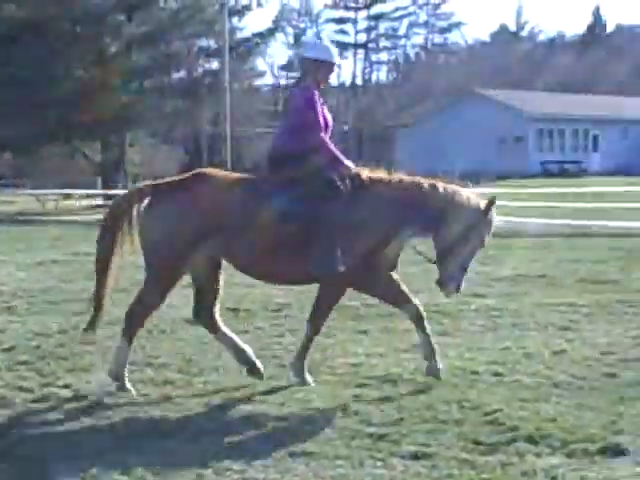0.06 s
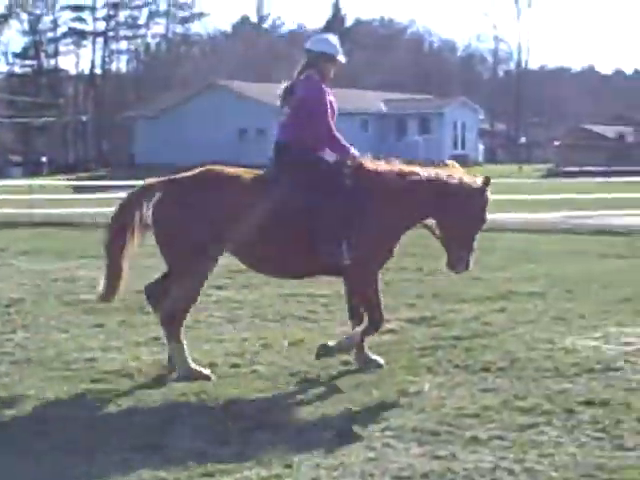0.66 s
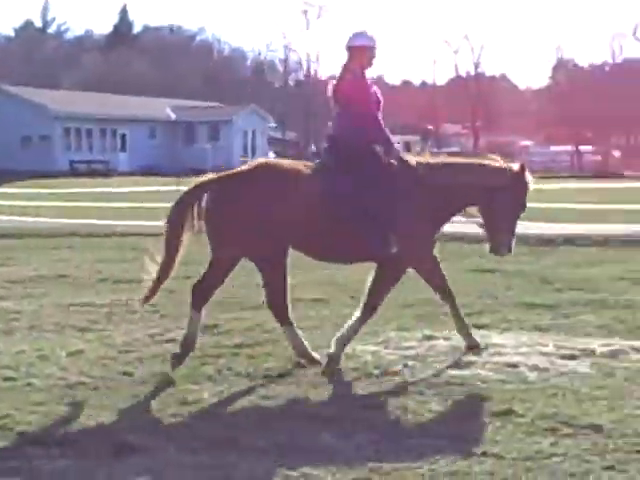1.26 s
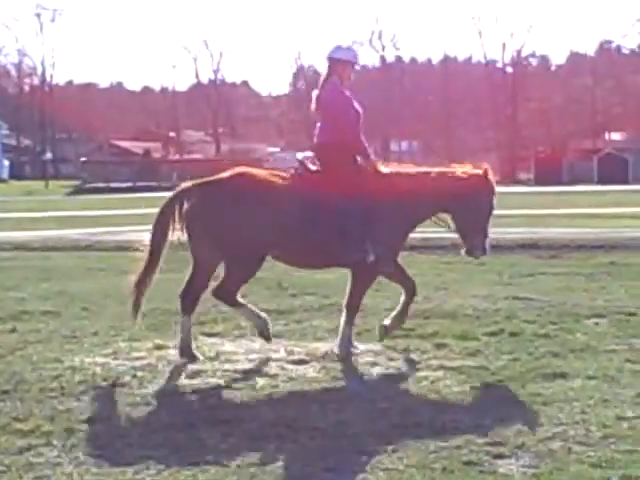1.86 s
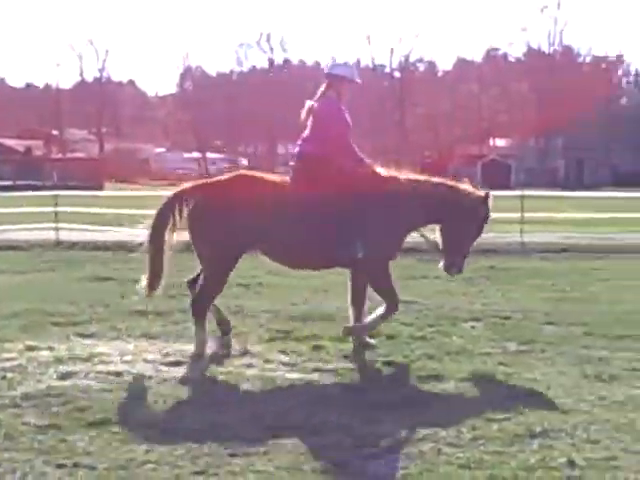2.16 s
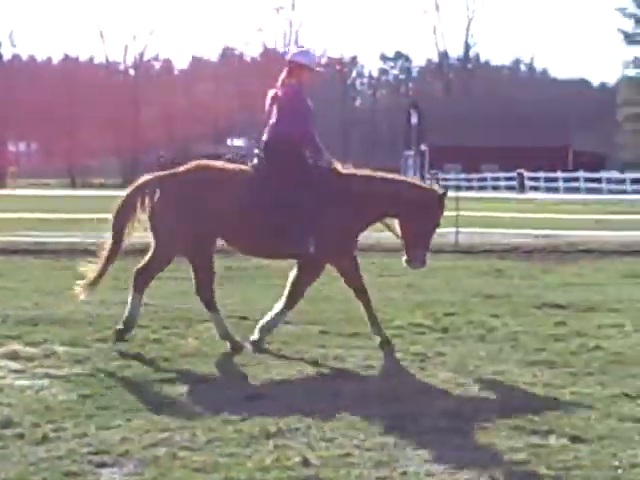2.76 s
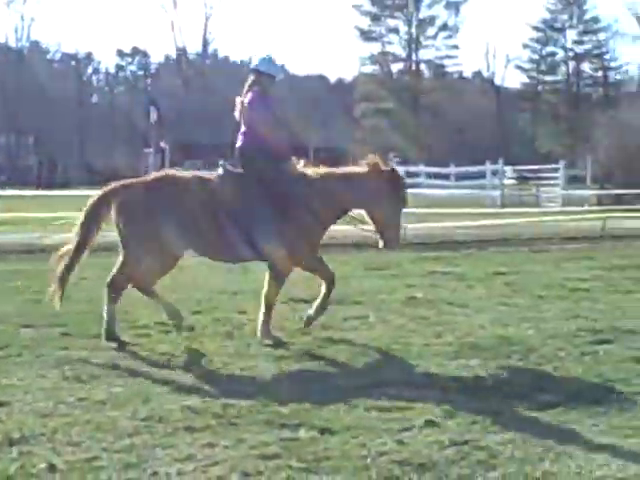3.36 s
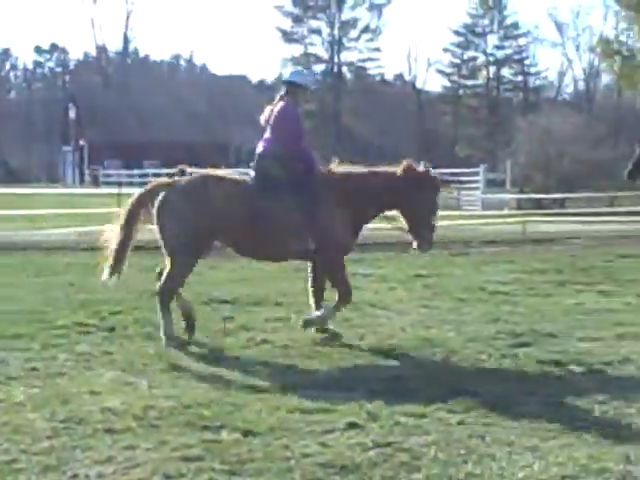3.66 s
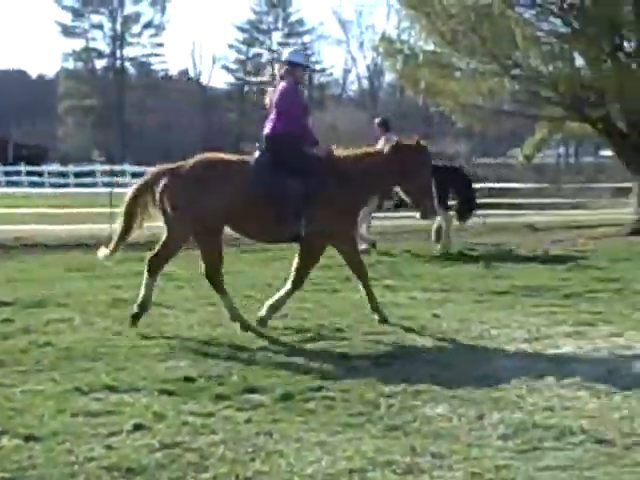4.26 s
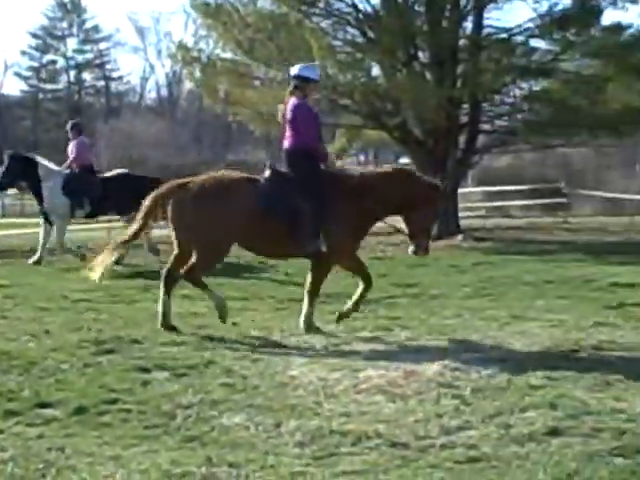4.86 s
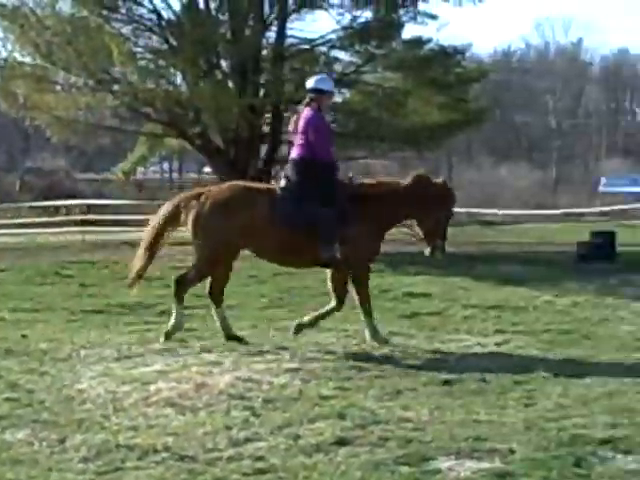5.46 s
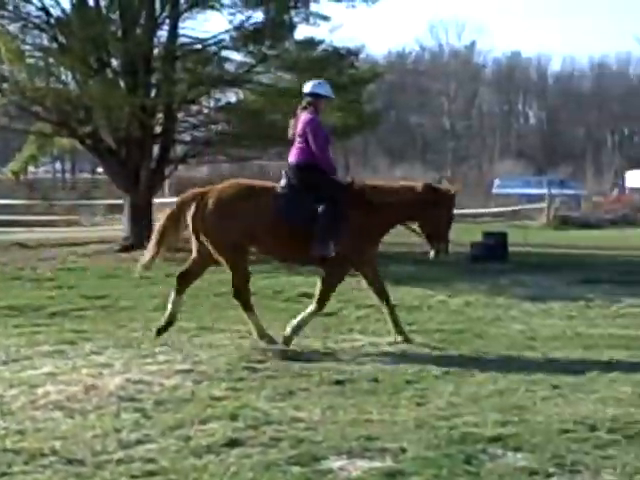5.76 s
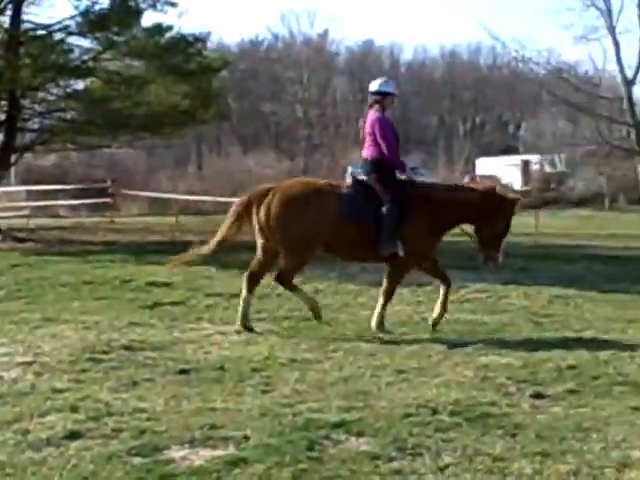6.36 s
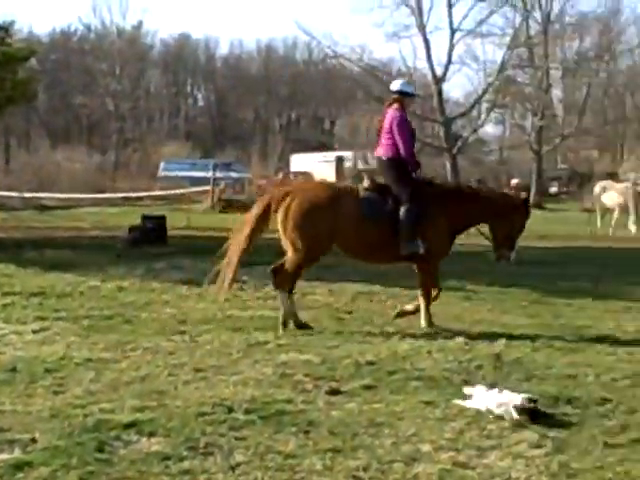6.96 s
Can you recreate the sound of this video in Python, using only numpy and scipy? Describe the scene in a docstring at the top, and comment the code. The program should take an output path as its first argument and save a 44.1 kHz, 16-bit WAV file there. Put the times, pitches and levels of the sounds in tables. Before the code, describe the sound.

A horse trots over grass with soft thuds and swishes, while small birds chirp over light wind and a distant engine drone.

```python
"""Light wind rumbles on the microphone of a small camera in an open grass field; a far engine drones.
A horse trots across: on each beat a soft thud in the turf, then two legs swishing through the blades.
It crunches through dry straw; elsewhere along the path stalks snap, a buckle clinks and leather creaks.
Small songbirds buzz and chirrup nearby, others sing farther off, and the camera adds a thin whine."""
import sys
import numpy as np
from scipy import signal
from scipy.fft import rfft, irfft, next_fast_len
from scipy.io import wavfile
from scipy.ndimage import uniform_filter1d, map_coordinates

SR = 44100
rng = np.random.default_rng(int(sys.argv[2]) if len(sys.argv) > 2 else 0)


def transcribe(u):
    """Save the signal u as a 16-bit wav file named by the first command-line argument.

    u: samples, shape (n,) or (channels, n), limited to [-1, 1]; the rate is SR.
    q: integer samples, one column per channel.
    """
    v = np.clip(np.atleast_2d(u).T, -1, 1)
    q = np.round(v * 32767).astype(np.int16)
    wavfile.write(sys.argv[1], SR, q)


N = 317079
TIME = np.arange(N) / SR


def amp(db):
    """Decibels to gain."""
    return 10 ** (np.asarray(db) / 20)


def unit(x):
    """Scales to rms 1."""
    return x / np.sqrt(np.mean(x ** 2) + 1e-20)


def curve(rows):
    """Joins (seconds, value) rows over the whole scene."""
    return np.interp(TIME, *np.transpose(rows))


def add(mix, start, sound):
    """Mixes a sound in at a start time in seconds."""
    part = mix[max(round(start * SR), 0):][:len(sound)]
    part += sound[:len(part)]


def colour(x, points, tilt_db=0):
    """Filters by a (Hz, dB) spectrum, tilted by dB per octave."""
    size = next_fast_len(len(x))
    octave = np.log2(np.fft.rfftfreq(size, 1 / SR) + 1)
    hz, db = np.transpose(points)
    corners = np.log2(hz)
    tilt = tilt_db * (np.clip(octave, corners[0], corners[-1]) - corners[-1])
    gain = amp(np.interp(octave, corners, db) + tilt)
    return irfft(rfft(x, size) * gain, size)[:len(x)]


def band(x, hz, width_octaves):
    """Steep band-pass reaching width_octaves to each side of hz, rms 1."""
    edges = np.clip(hz * 2 ** (np.array([-1, 1]) * width_octaves), 100, SR / 2 - 100)
    return unit(signal.sosfilt(signal.butter(3, edges, btype="band", fs=SR, output="sos"), x))


def low_pass(x, hz):
    """Steep cut above hz."""
    return signal.oaconvolve(x, signal.firwin(511, hz, window=("kaiser", 9), fs=SR), "same")


def noise(points):
    """Steady noise of a given colour, rms 1."""
    return unit(colour(rng.standard_normal(N), points))


def drift(rate):
    """Slow random wander of rms 1, up to about rate cycles a second."""
    coarse = TIME[::64]
    wander = map_coordinates(rng.standard_normal(1024), [coarse * 2 * rate], order=2, mode="wrap")
    return np.interp(TIME, coarse, unit(wander))


def crackle(count, per_s, spread_db, hiss):
    """Many tiny fractures of uneven size over a bed of rubbing noise."""
    size = amp(spread_db * np.minimum(rng.exponential(1, count), 4))
    clicks = size * rng.choice([-1, 1], count) * (rng.random(count) < per_s / SR)
    return unit(unit(clicks) + hiss * rng.standard_normal(count))


# The breeze at the microphone, dying down. Each row: time in seconds, relative level in dB.
BREEZE = [(0, -41), (1.3, -42), (2.0, -50.5), (3.7, -48.5), (4.3, -51.5), (7.19, -54)]
# Gusts right on the microphone. Each row: peak time and half length in seconds, relative level in dB.
GUSTS = [(0.01, 0.059, -30.5), (0.683, .13, -37), (1.65, .05, -37), (2.787, 0.04, -40.5),
         (3.775, 0.055, -36.5)]
# The rumble they both make. Each row: frequency in Hz, relative level in dB.
WIND_COLOUR = [(1, -34), (4, -15.5), (9, 2), (20, -6.5), (35, -5), (60, -11.5), (100, -17.5), (160, -27.5),
               (300, -43.5), (800, -70.5)]


def wind(level_db=1.0, restless_db=3.0):
    """Eddies push on the microphone: a restless breeze and a few brief gusts."""
    breeze = amp(curve(BREEZE) + restless_db * drift(4))
    gusts = sum(amp(db) * np.exp(-((TIME - peak) / half) ** 2) for peak, half, db in GUSTS)
    return amp(level_db) * np.hypot(breeze, gusts) * noise(WIND_COLOUR)


# The field ahead of the camera, before and after it turns. Each row: frequency in Hz, relative dB.
FIELD_BEFORE = [(20, 14.5), (60, 20), (100, 15), (150, 10), (210, 7), (290, 0), (450, -1.5), (640, 0),
                (800, -5), (1020, -1), (1500, -9), (2100, -12), (4000, -13), (7000, -16)]
FIELD_AFTER = [(20, 9.5), (60, 18), (100, 20.5), (150, 7.5), (210, 5), (290, -1.5), (470, 0.5), (800, -2.5),
               (1150, -4.5), (1500, -7), (2100, -10.5), (3300, -13), (7000, -13.5)]
# The camera's turn. Each row: time in seconds, share of the turn from 0 to 1.
TURN = [(1.6, 0), (3.2, 1)]
# Two far rushes, a low one midway and a higher one at the end. Each row: time in seconds, level in dB.
LOW_RUSH = [(2.6, -67.5), (3.2, -60.5), (3.8, -61.5), (4.4, -73)]
HIGH_RUSH = [(6.6, -73), (6.95, -66.5), (7.19, -62.5)]
# Their spectra at the microphone. Each row: frequency in Hz, relative level in dB.
LOW_RUSH_COLOUR = [(120, -12.5), (210, 3.5), (300, -4.5), (420, -3), (600, -11.5), (1000, -25.5)]
HIGH_RUSH_COLOUR = [(700, -33.5), (1050, 2), (1250, -1.5), (1500, -10), (2200, -30)]


def field(level_db=-49.8, restless_db=0.59):
    """The far wash of open country changes colour as the camera turns; two faint rushes swell in it."""
    turned = np.clip(curve(TURN), 0, 1)
    wash = np.sqrt(1 - turned) * noise(FIELD_BEFORE) + np.sqrt(turned) * noise(FIELD_AFTER)
    high_rush = amp(curve(HIGH_RUSH)) * noise(HIGH_RUSH_COLOUR)
    low_rush = amp(curve(LOW_RUSH)) * noise(LOW_RUSH_COLOUR)
    return amp(level_db + restless_db * drift(9)) * wash + high_rush + low_rush


# An engine a long way off. Each row: time in seconds, speed in cycles a second.
ENGINE_SPEED = [(0, 28.2), (1.0, 24.0), (1.35, 23.2), (2.0, 22.9), (2.64, 26.1), (3.0, 27.2), (3.3, 26.9),
                (3.9, 23.4), (4.35, 21.1), (4.8, 20.8), (5.5, 25.6), (6.05, 26.5), (6.4, 26.3),
                (6.65, 24.8), (7.19, 24.2)]
# Its drone at the microphone. Each row: time in seconds, level in dB.
ENGINE_LEVEL = [(0, -43.5), (1.2, -44.5), (3.1, -41.5), (4.2, -49.5), (4.6, -44.5), (4.95, -48.5),
                (5.5, -43), (6.45, -41.5), (6.8, -47), (7.19, -43.5)]
# Its harmonics. Each row: multiple of the engine speed, relative level in dB.
ENGINE_ORDERS = [(1, -11.5), (2, 2), (3, 0.5), (4, -7), (5, -20), (6, -15), (7, -18), (8, -28.5), (9, -25),
                 (10, -34.5)]
# The boom of its exhaust. Each row: time in seconds, lift at the resonance in dB.
EXHAUST_LIFT = [(0, 2.5), (2.35, 9), (3.6, 5), (5.6, 9), (7.19, 10)]


def engine(exhaust_hz=149.2, exhaust_width_hz=12.2, waver_db=1.7, phase_wander=0.22, smear=0.5):
    """A far engine's harmonics swell as they cross the exhaust resonance; moving air makes each waver."""
    speed, lift = curve(ENGINE_SPEED), curve(EXHAUST_LIFT)
    turns, out = np.cumsum(speed) / SR, np.zeros(N)
    for order, db in ENGINE_ORDERS:
        lift_db = lift / (1 + ((order * speed - exhaust_hz) / exhaust_width_hz) ** 2)
        lag = smear * order ** 2  # higher orders lag, blurring each throb
        phase = 2 * np.pi * order * turns - lag + phase_wander * drift(4)
        out -= amp(db + lift_db + waver_db * drift(3)) * np.sin(phase)
    return amp(curve(ENGINE_LEVEL)) * unit(out)


# Songbirds in the far trees. Each row: frequency in Hz, relative level in dB.
CHORUS_COLOUR = [(2050, -37.5), (2380, -4), (2500, -1.5), (2640, -8), (3000, -39.5)]


def chorus(level_db=-75, swell_db=2.5):
    """Distance blurs the song into a faint band that comes and goes."""
    return amp(level_db + swell_db * drift(4)) * noise(CHORUS_COLOUR)


# Grass along the horse's path, ticking here and swishing below. Each row: frequency in Hz, relative dB.
GRASS_COLOUR = [(600, -28.5), (1500, -12.5), (2600, -5), (3300, -4), (4200, 2.5), (4900, -4), (5900, 4.5),
                (7000, -1), (8000, -5), (9000, -29.5)]


def stubble(per_s=200, level_db=-68, decay_s=0.0011, spread_db=4.5):
    """Trodden blades tick as they straighten, most faintly, a few clearly."""
    t = np.arange(SR // 100) / SR
    tick = rng.standard_normal(len(t)) * np.exp(-t / decay_s)
    clicks = crackle(N, per_s, spread_db, hiss=0)
    ticks = signal.oaconvolve(clicks, tick)[:N]
    return amp(level_db) * unit(colour(ticks, GRASS_COLOUR))


# The trot across the field, one diagonal pair of hooves a beat. Each row: start in seconds,
# relative levels of thud, foreleg swish and hind leg swish in dB, delay of the hind leg in seconds.
STEPS = [(0.135, -54, -59.5, -56.5, .175), (0.505, -48.5, -54, -53, 0.17), (0.860, -60, -56.5, -58, 0.16),
         (1.212, -49.5, -54, -55, 0.19), (1.580, -64, -54, -58, 0.21), (1.950, -58, -51, -46.5, .2),
         (2.315, -52, -51.5, -48.5, .187), (2.735, -60, -61.5, -57.5, 0.19), (3.101, -57, -59.5, -56, 0.23),
         (3.476, -50.5, -57.5, -57.5, 0.19), (3.840, -66, -56, -53.5, 0.18), (4.215, -65, -55, -59, 0.23),
         (4.615, -62, -59.5, -59, .19), (4.980, -62, -59.5, -54, .21), (5.372, -52.5, -57, -55, .172),
         (5.725, -57, -57.5, -58, .21), (6.100, -70, -57.5, -54, .17), (6.474, -49.5, -58, -58, .19),
         (6.840, -57, -60.5, -63, 0.14)]
# Dull knocks between the beats. Each row: start in seconds, relative level in dB.
BUMPS = [(0.295, -50.5), (1.010, -51.5), (1.440, -49), (1.465, -56), (4.095, -51), (6.226, -48.5)]
# The turf under the hooves. Each row: frequency in Hz, relative level in dB.
TURF_COLOUR = [(30, -4.5), (80, 9.5), (160, 7.5), (320, -11), (480, -3.5), (630, 1), (800, -12), (1020, -7),
               (1600, -14), (4000, -20.5)]


def hoofbeats(rise_s=0.004, decay_s=0.028, level_db=4, knock_hz=625, knock_db=-5, knock_decay_s=0.011):
    """Each hoof presses into soft turf: a dull push with a short hollow knock."""
    out, t = np.zeros(N), np.arange(SR // 4) / SR
    press = 1 - np.exp(-t / rise_s)
    for start, db, *_ in STEPS + BUMPS:
        push = np.exp(-t / decay_s) * unit(colour(rng.standard_normal(len(t)), TURF_COLOUR))
        hz = knock_hz * rng.uniform(0.94, 1.06)
        knock = amp(knock_db) * np.exp(-t / knock_decay_s) * np.sin(2 * np.pi * hz * t)
        add(out, start, amp(db + level_db) * press * (push + knock))
    return out


# The path sounds crisper where it is dry. Each row: time in seconds, brightness in dB per octave.
DRYNESS = [(0.25, -2), (0.6, 1), (1.3, 7), (1.6, 6), (2.45, 6.5), (2.9, 0.5), (4.0, 2), (5.3, 2.5),
           (6.6, -3.5)]


def swish(peak, rise, fall, fall_shape=1.08, uneven_tilt_db=2.4, linger_per_db=0.13):
    """Blades bend, crackle and spring back around the peak time; returns the start time and the sound."""
    t = np.arange(-SR // 8, SR // 3) / SR
    bright_db = np.interp(peak, *np.transpose(DRYNESS))
    linger = fall * (1 + linger_per_db * bright_db)  # dry blades rustle on longer
    stroke = np.exp(-np.where(t < 0, (t / rise) ** 2, abs(t / linger) ** fall_shape))
    blades = crackle(len(t), per_s=1500, spread_db=3.0, hiss=0.53)
    tilt_db = bright_db + uneven_tilt_db * rng.standard_normal()
    return peak + t[0], stroke * unit(colour(blades, GRASS_COLOUR, tilt_db))


# Tufts of dry straw crushed underfoot. Each row: peak time and base fall time in seconds, level in dB.
CRUNCHES = [(1.5643, 0.044, -44), (1.947, 0.015, -45), (2.195, 0.023, -50), (3.360, 0.053, -52.5)]


def grass(uneven_db=1.5, crunch_rise_s=0.004, landing_db=-4, fore_share=0.45):
    """Three swishes go with every beat of the trot; dry tufts give way abruptly."""
    strokes = [(peak, crunch_rise_s, fall, db) for peak, fall, db in CRUNCHES]
    for beat, _, fore_db, hind_db, delay in STEPS:
        strokes += [(beat, 0.021, 0.02, fore_db + landing_db),  # the hooves brush in as they land
                    (beat + fore_share * delay, 0.04, 0.026, fore_db),  # the foreleg drags through
                    (beat + delay, 0.023, 0.034, hind_db)]  # the hind leg flicks more sharply
    out = np.zeros(N)
    for peak, rise, fall, db in strokes:
        start, sound = swish(peak, rise, fall)
        add(out, start, amp(db + uneven_db * rng.standard_normal()) * sound)
    return out


# Dry stalks and twigs along the path.
# Each row: time of the break in seconds, relative level in dB, centre in Hz, decay in seconds.
SNAPS = [(0.772, -43.5, 7500, .0023), (0.856, -40, 6000, .0023), (1.013, -40.5, 6100, 0.0031),
         (1.201, -41, 6460, .003), (3.303, -44.5, 5400, .003), (3.32, -34, 3530, 0.0073),
         (3.3456, -34, 3940, 0.0057), (3.372, -39, 4500, 0.0031), (3.464, -38.5, 6200, 0.0037),
         (3.681, -42, 3600, 0.0021), (3.905, -41.5, 5230, 0.0015), (4.700, -48, 3550, .008),
         (4.738, -42, 3880, .0024), (4.782, -38, 4970, .0011), (4.794, -39.5, 4200, 0.003),
         (4.828, -39, 3420, 0.00073), (4.951, -41.5, 5900, .0016), (5.039, -43.5, 3800, 0.0078),
         (5.678, -40.5, 2690, .0012), (5.685, -46, 5200, 0.0013), (6.2203, -35, 2980, 0.0015),
         (6.405, -48, 3000, .006), (6.521, -45.5, 1310, 0.0027), (6.71, -41.5, 3870, 0.0035)]


def snaps(level_db=-4, ring_db=2.0, give_s=0.0023, give_db=-12, splinter=0.12, splinter_decay_s=0.03):
    """A stalk gives, breaks in a short burst coloured by its own uneven ring, then splinters weakly."""
    out, t = np.zeros(N), np.arange(-SR // 100, SR // 16) / SR
    ring_hz = np.geomspace(1000, 9000, num=24)
    give = amp(give_db) * np.exp(-abs(t) / give_s)
    for moment, db, hz, decay in SNAPS:
        ring = np.column_stack([ring_hz, ring_db * rng.standard_normal(len(ring_hz))])
        fibres = band(colour(rng.standard_normal(len(t)), ring), hz, width_octaves=0.55)
        burst = np.exp(-abs(t) / decay) + splinter * np.exp(-abs(t) / splinter_decay_s)
        add(out, moment + t[0], amp(db + level_db) * fibres * np.where(t < 0, give, burst))
    return out


def whistle(hz, shimmer_db=2.5, warble=0.006):
    """A bird's pure tone on a pitch curve, trembling in level and pitch."""
    count = len(hz)
    pitch = hz * (1 + warble * drift(40)[:count])
    tone = np.sqrt(2) * np.sin(2 * np.pi * np.cumsum(pitch) / SR)
    shimmer = unit(amp(shimmer_db * drift(70)[:count]))
    return tone * shimmer * signal.windows.tukey(count, 0.1)


# Songbird syllables: a falling buzzy slur, a clear flick, a chirrup that climbs and drops. Each row:
# share of the syllable, Hz above the middle pitch at full sweep, relative level in dB, buzz depth in Hz.
SLUR = [(0, 1003, -2, 420), (.3, 649, 2, 450), (.62, -200, -2.5, 280), (1, -600, -1, 80)]
FLICK = [(0, 702, -12, 120), (.5, 0, -1.5, 40), (1, -600, -7, 20)]
CHIRRUP = [(0, -1, -5, 302), (.12, 594, -1.5, 444), (.32, -26, 2, 278), (.56, 798, -7.5, 454),
           (.72, 1499, -2.5, 204), (.84, -48, 1.5, 51), (1, -650, -9, 0)]
# Small songbirds near the microphone. Each row: start and length in seconds, level in dB,
# middle pitch in Hz, width of the sweep from 0 to 1, syllable.
BIRD_CALLS = [(1.222, .11, -48, 4740, 1, "chirrup"), (1.434, 0.085, -47, 4780, 1, "slur"),
              (1.518, 0.047, -50.5, 4270, 0.64, "flick"), (2.173, 0.055, -53.5, 4190, 0.66, "slur"),
              (2.906, .09, -53, 4710, 0.8, "slur"), (3.012, 0.038, -55.5, 4200, 0.75, "flick"),
              (3.632, 0.068, -58.5, 4470, 0.54, "slur"), (3.702, 0.043, -51.5, 4450, 1, "flick"),
              (3.752, 0.02, -55, 4050, .4, "flick"), (4.805, .114, -51, 4620, 1, "chirrup"),
              (5.155, .08, -56, 4750, 0.97, "slur")]


def near_birds(buzz_hz=210, jitter=0.13, rasp=0.3):
    """Gliding whistles nearby; a fast, ragged flutter of the pitch makes them buzz."""
    out = np.zeros(N)
    syllables = {"slur": SLUR, "flick": FLICK, "chirrup": CHIRRUP}
    for start, length, level_db, middle_hz, sweep, syllable in BIRD_CALLS:
        count = round(length * SR)
        share, *columns = np.transpose(syllables[syllable])
        bend, db, depth = (np.interp(np.linspace(0, 1, count), share, column) for column in columns)
        flutter_hz = buzz_hz * (1 + jitter * drift(60)[:count])
        flutter = np.sin(2 * np.pi * np.cumsum(flutter_hz) / SR)
        ragged = rasp * unit(uniform_filter1d(rng.standard_normal(count), size=30))
        pitch = middle_hz + sweep * bend + depth * (flutter + ragged)
        add(out, start, amp(level_db + db) * whistle(pitch))
    return out


def among_trees(calls, echo_db=-12, decay_s=0.025):
    """Calls reach the microphone directly and as a short echo scattered back by the trees."""
    t = np.arange(SR // 3) / SR
    scatter = rng.standard_normal(len(t)) * np.exp(-t / decay_s)
    echo = signal.fftconvolve(calls, scatter / np.linalg.norm(scatter))[:N]
    return calls + amp(echo_db) * echo


# One bird's rasp from far off. Each row: frequency in Hz, relative level in dB.
TRILL_COLOUR = [(2000, -39.5), (2500, -9), (2800, -1), (3050, -8), (3500, -47)]


def trill(start_s=1.9, length_s=0.8, level_db=-66, fade_share=0.36):
    """A far bird holds one rasping trill, heard as a narrow band of noise."""
    out, count = np.zeros(N), round(length_s * SR)
    fade = signal.windows.tukey(count, fade_share)
    add(out, start_s, amp(level_db) * fade * noise(TRILL_COLOUR)[:count])
    return out


# Birds farther off. Each row: start and length in seconds, first and last pitch in Hz, level in dB.
FAR_WHISTLES = [(2.283, .09, 5150, 5160, -60), (3.76, 0.1, 7250, 7740, -61.5),
                (6.022, .08, 5400, 5220, -67), (6.115, 0.067, 5400, 5170, -65),
                (6.87, 0.12, 2200, 2570, -67)]


def far_whistles(glide_shape=1.4):
    """Thin whistles from farther off, each easing from one pitch to another."""
    out = np.zeros(N)
    for start, length, first_hz, last_hz, db in FAR_WHISTLES:
        glide = np.linspace(1, 0, round(length * SR)) ** glide_shape
        add(out, start, amp(db) * whistle(last_hz + (first_hz - last_hz) * glide))
    return out


# A buckle clinking on the horse. Each row: start in seconds, relative level in dB.
CLINKS = [(3.3218, -44), (3.3455, -37.5), (3.361, -50), (3.39, -57)]
# Its modes. Each row: frequency in Hz, relative level in dB, seconds to fall by 60 dB.
BUCKLE_MODES = [(3010, -7, 0.041), (3840, -4.5, .04), (5230, 0, 0.027), (5700, 1, 0.036),
                (5740, 3.5, 0.038)]


def buckle(level_db=-0.5):
    """A steel fitting on the tack rings briefly, damped by its strap."""
    out, t = np.zeros(N), np.arange(SR // 12) / SR
    for start, blow_db in CLINKS:
        ring = sum(amp(db - 60 * t / t60) * np.sin(2 * np.pi * (hz * t + rng.random()))
                   for hz, db, t60 in BUCKLE_MODES)
        add(out, start, amp(blow_db + level_db) * ring)
    return out


# Creaks from the saddle. Each row: start and length in seconds, centre in Hz, level in dB.
CREAKS = [(4.188, 0.043, 3000, -58), (4.250, 0.047, 3080, -58), (4.258, 0.035, 4100, -58.5),
          (5.323, 0.034, 3400, -61), (5.795, 0.073, 3100, -59.5), (6.075, 0.044, 2900, -58.5)]


def saddle(slips_per_s=170, width_octaves=0.27):
    """Leather sticks and slips, each slip exciting a narrow squeak."""
    out = np.zeros(N)
    for start, length, hz, db in CREAKS:
        count = round(length * SR)
        cycles = np.cumsum(slips_per_s * (1 + rng.standard_normal(count))) / SR
        slips = np.exp(-2 * (cycles % 1)) * rng.standard_normal(count)
        add(out, start, amp(db) * band(slips, hz, width_octaves) * signal.windows.tukey(count, 0.5))
    return out


def scene():
    """Horse, birds, engine and air at one microphone in the field."""
    horse = hoofbeats() + grass() + snaps() + stubble() + saddle() + buckle()
    birds = among_trees(near_birds() + far_whistles()) + trill() + chorus()
    return (horse + birds + engine() + wind() + field())[None]


# Electronics inside the camera. Each row: frequency in Hz, level in dB before the roll-off.
WHINE = [(7540, -80.5), (7598, -73), (7656, -83.5)]
# The camera's gentle treble roll-off, acting on the mirrored band too. Each row: frequency in Hz, gain in dB.
CAMERA_ROLL_OFF = [(7000, -0.5), (7600, -3), (8000, -8), (8400, -15), (8900, -30)]


def record(dry, camera_rate_hz=16000, edge_hz=8950):
    """The camera adds its whine; its low sample rate mirrors the top of the band, which then rolls off."""
    whine = sum(np.sqrt(2) * amp(db) * np.sin(2 * np.pi * (hz * TIME + rng.random())) for hz, db in WHINE)
    in_band = low_pass(dry[0] + whine, camera_rate_hz / 2)
    mirrored = in_band * (1 + 2 * np.cos(2 * np.pi * camera_rate_hz * TIME))
    return low_pass(colour(mirrored, CAMERA_ROLL_OFF), edge_hz)[None]


dry = scene()
out = record(dry)
transcribe(out)
```